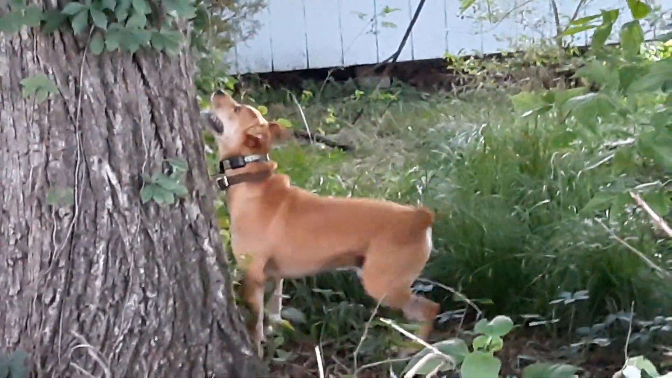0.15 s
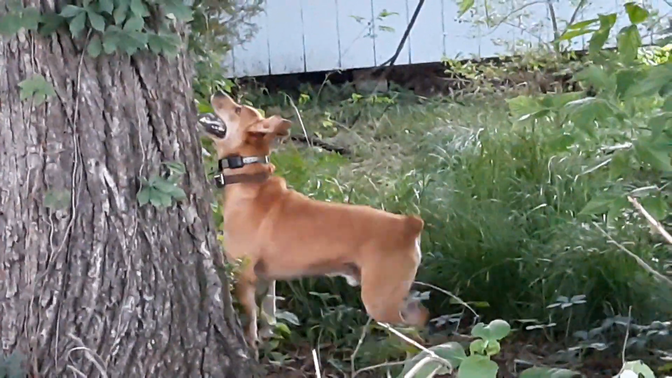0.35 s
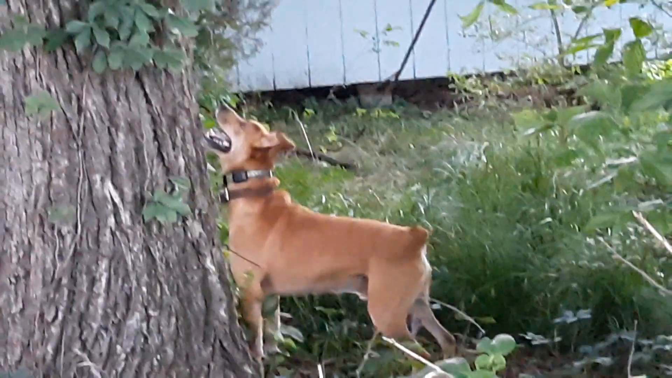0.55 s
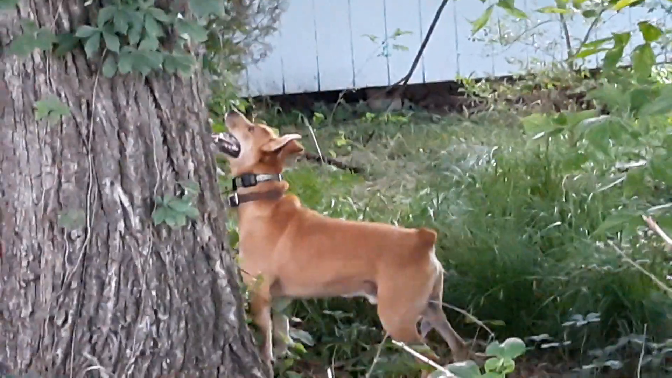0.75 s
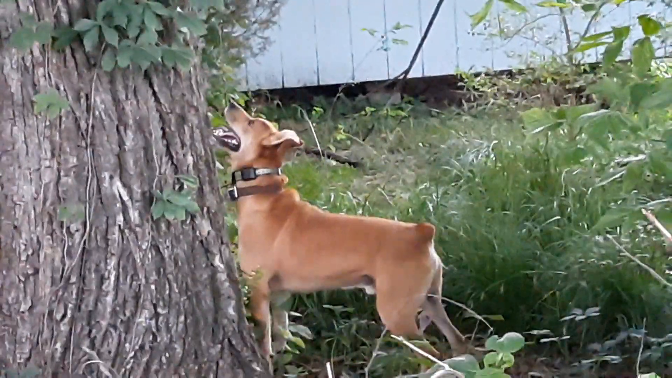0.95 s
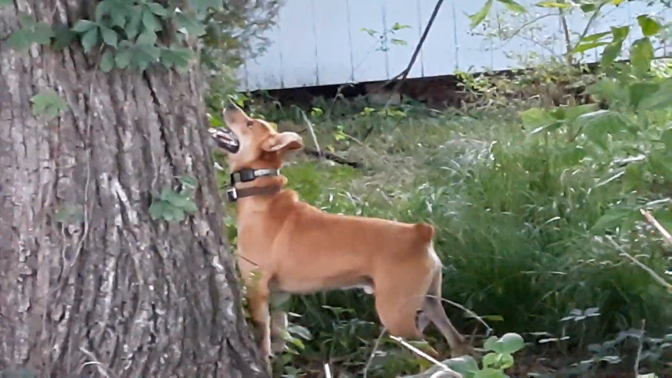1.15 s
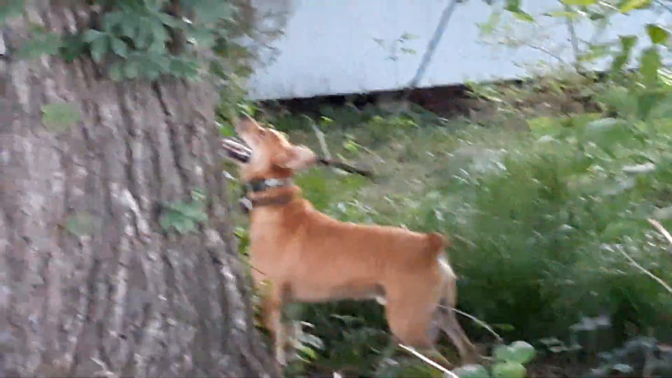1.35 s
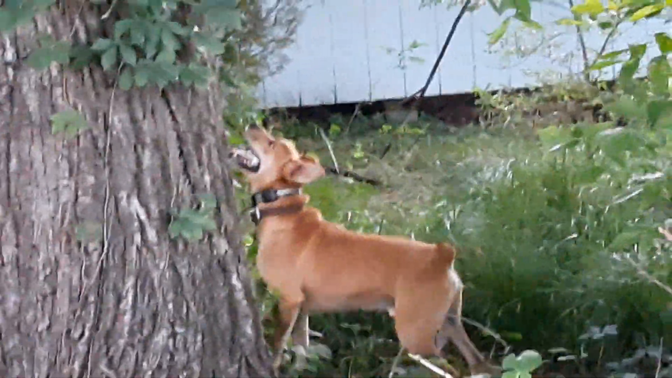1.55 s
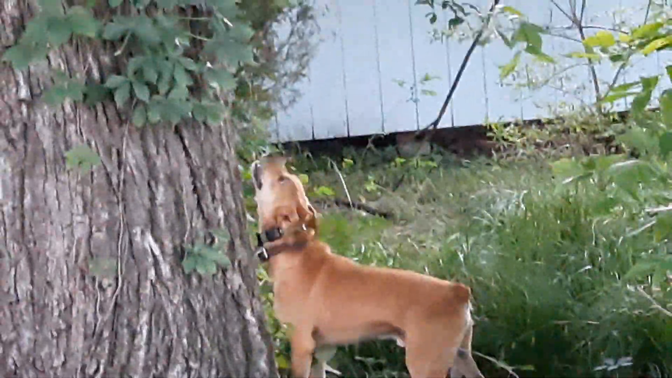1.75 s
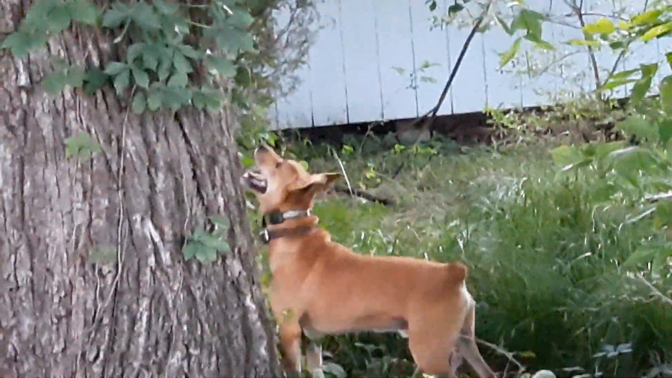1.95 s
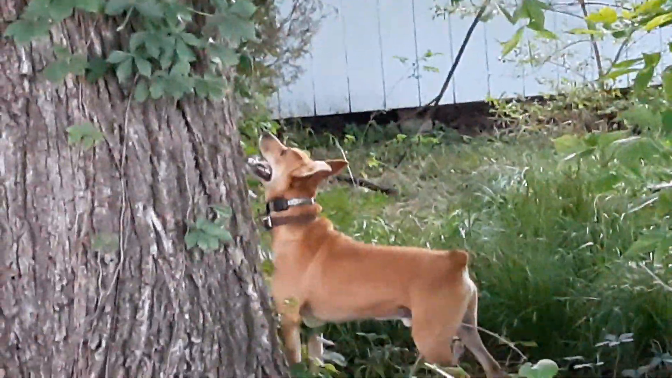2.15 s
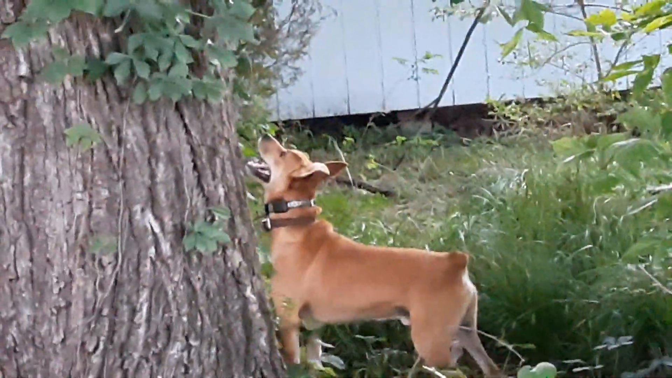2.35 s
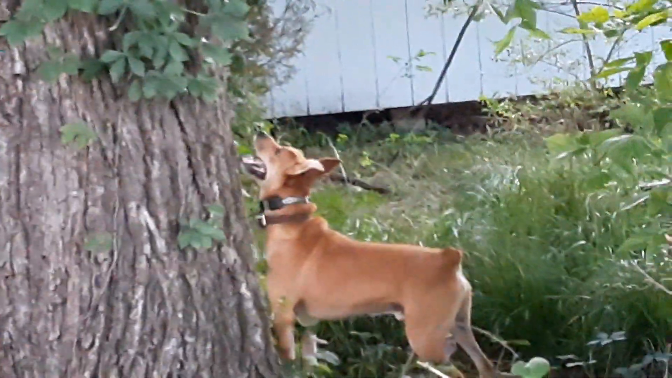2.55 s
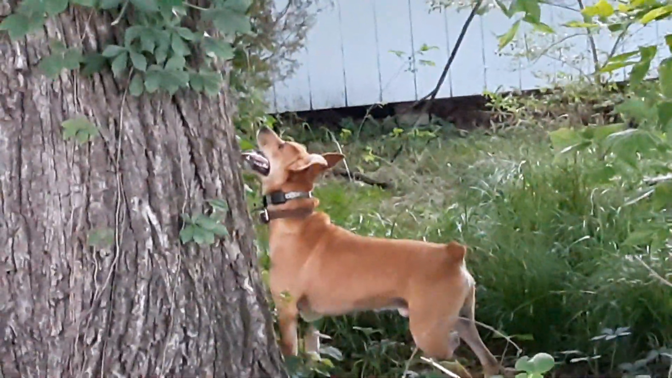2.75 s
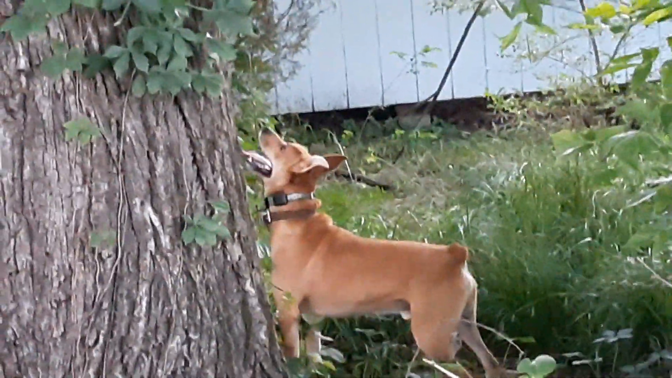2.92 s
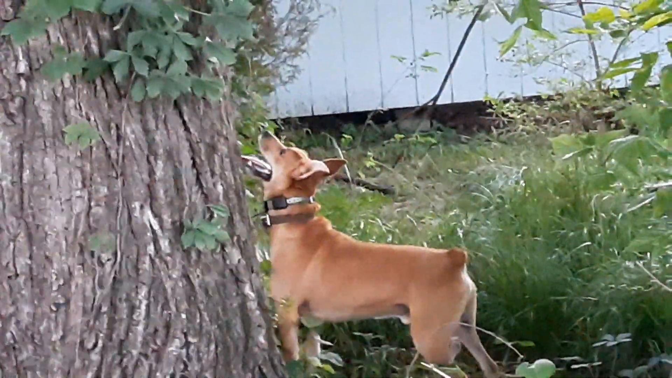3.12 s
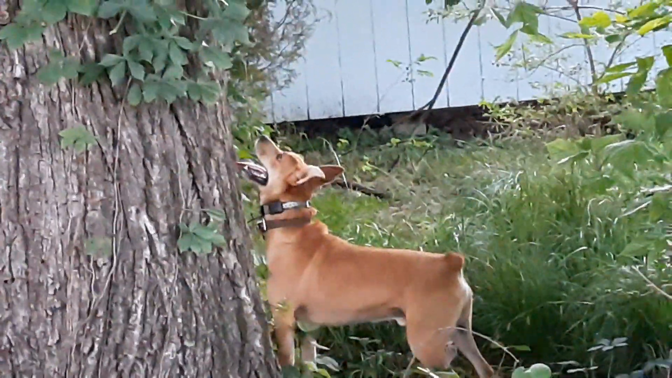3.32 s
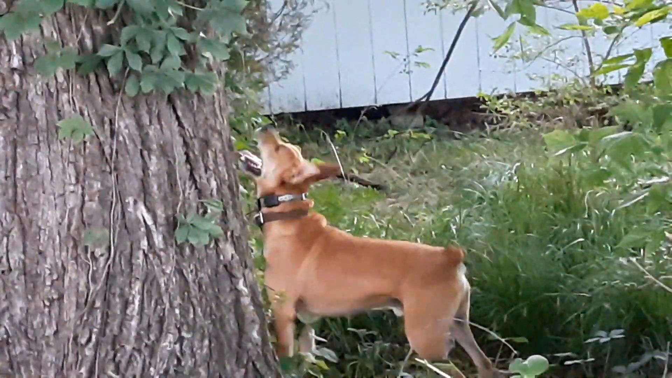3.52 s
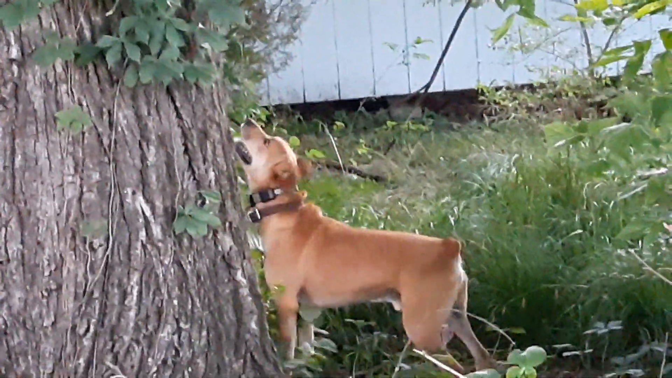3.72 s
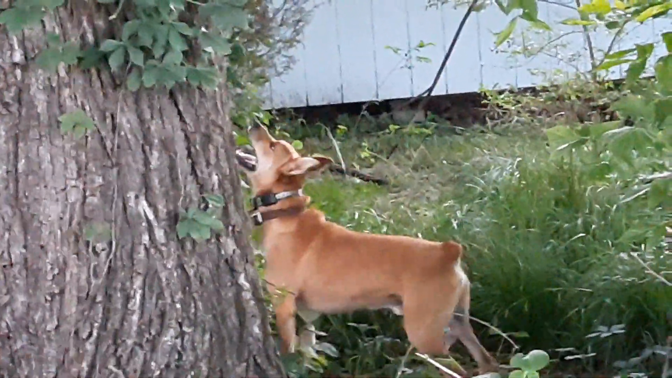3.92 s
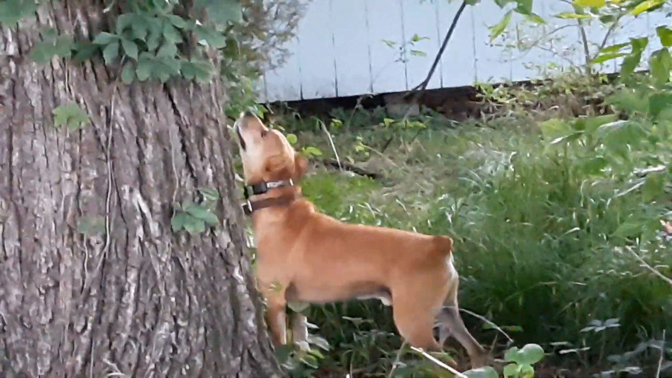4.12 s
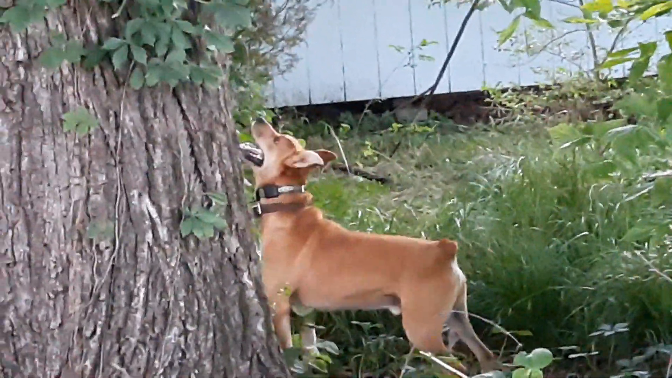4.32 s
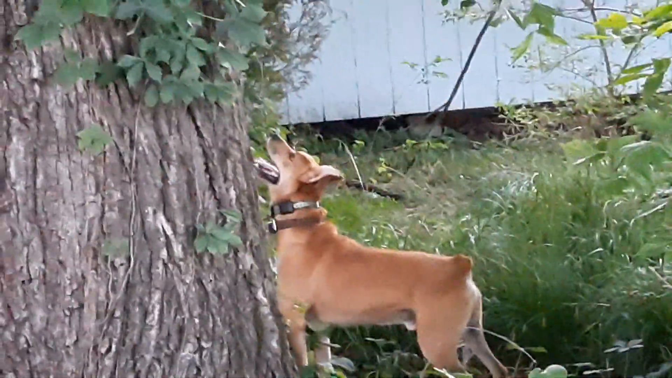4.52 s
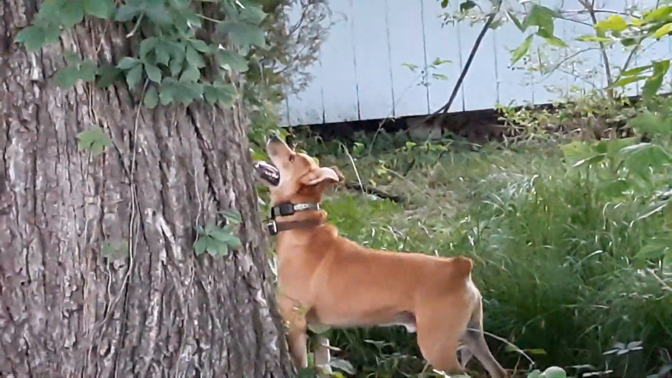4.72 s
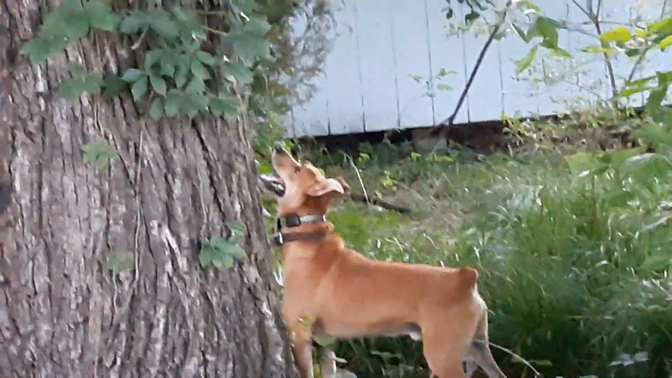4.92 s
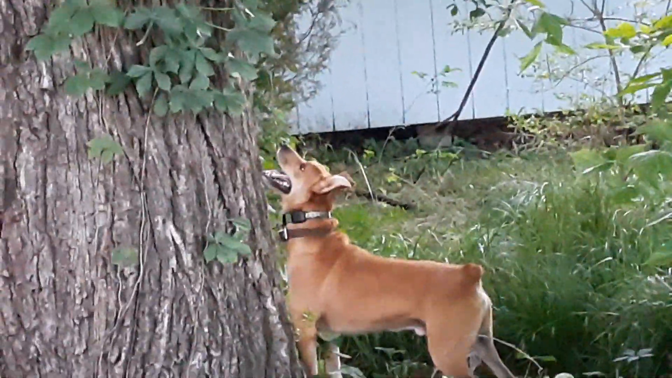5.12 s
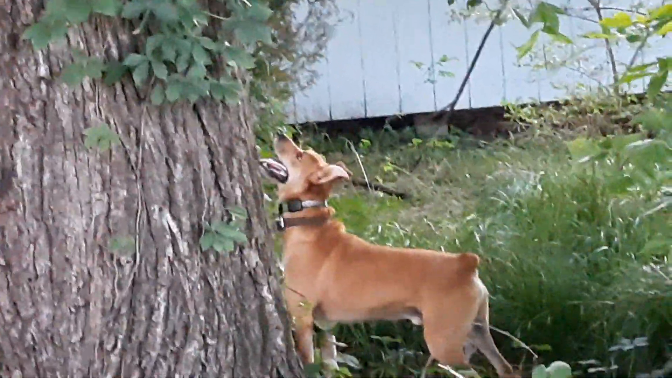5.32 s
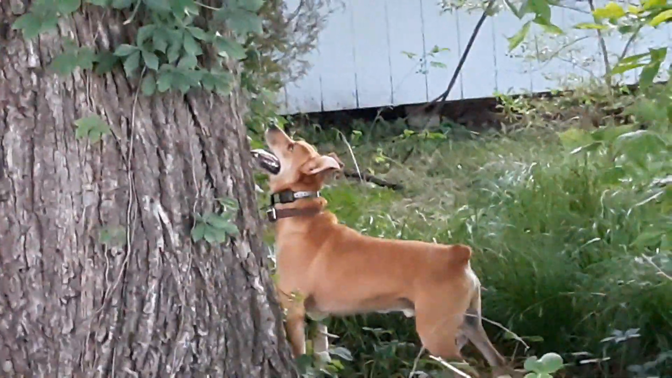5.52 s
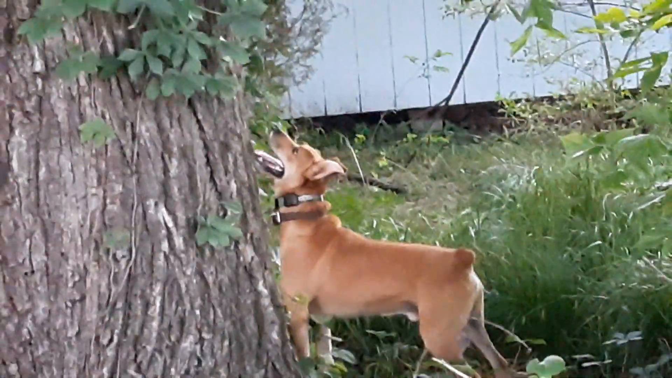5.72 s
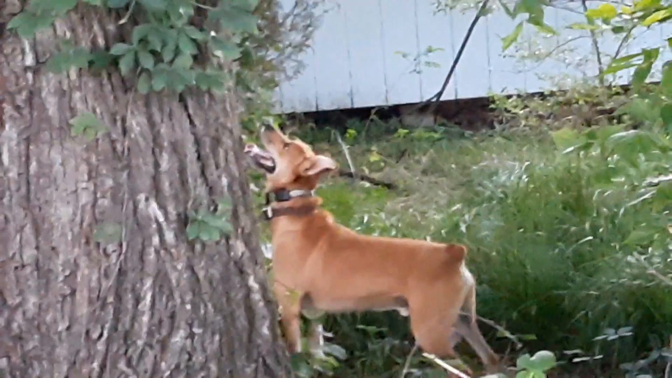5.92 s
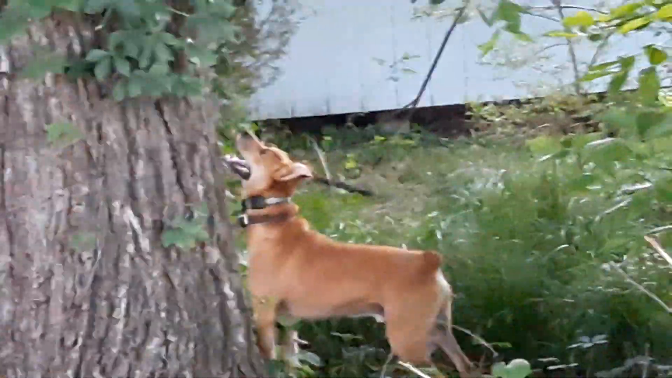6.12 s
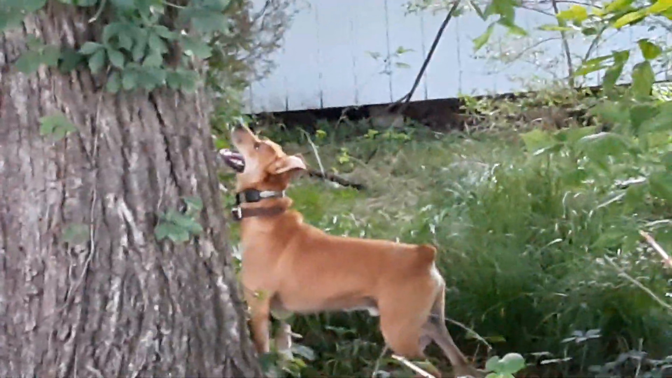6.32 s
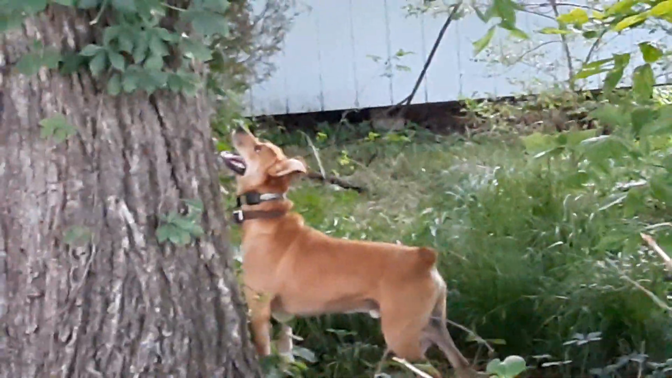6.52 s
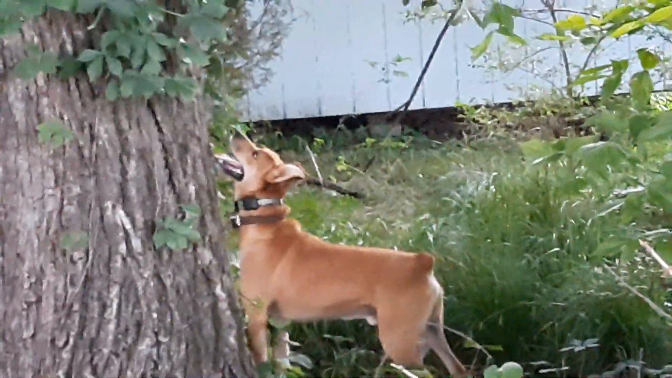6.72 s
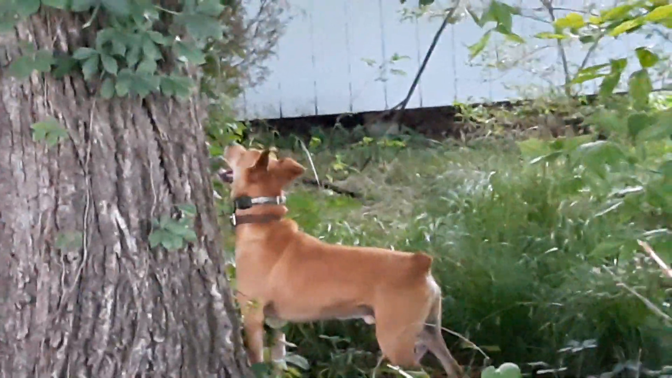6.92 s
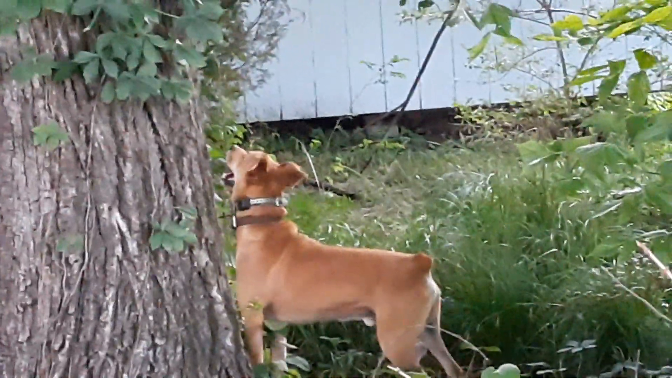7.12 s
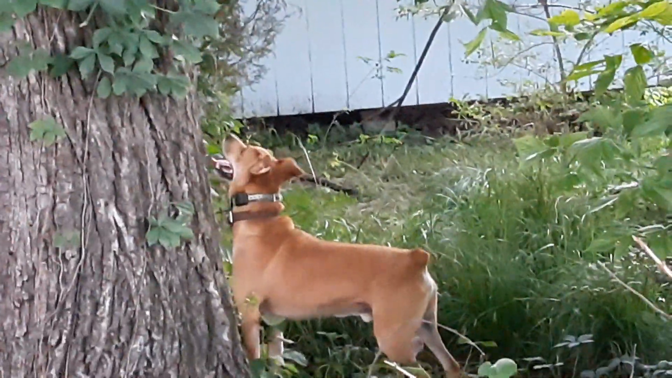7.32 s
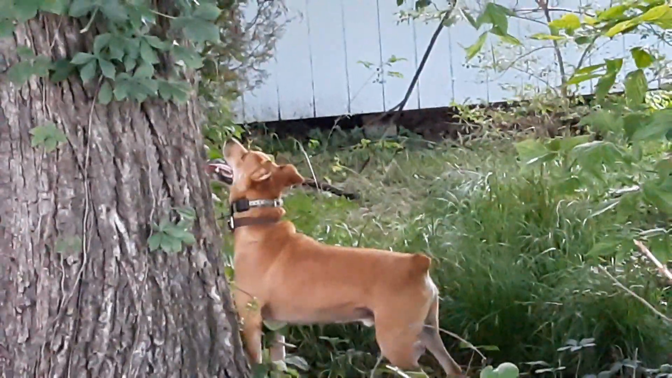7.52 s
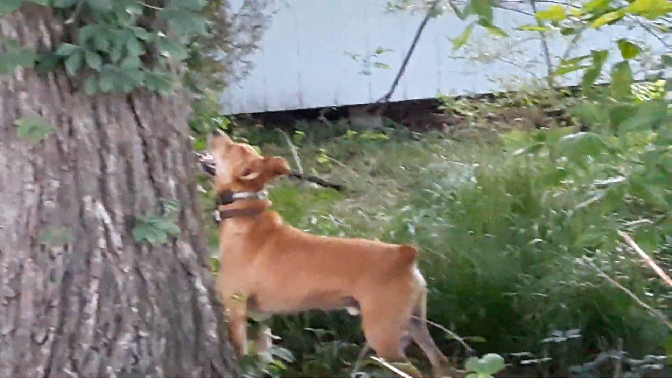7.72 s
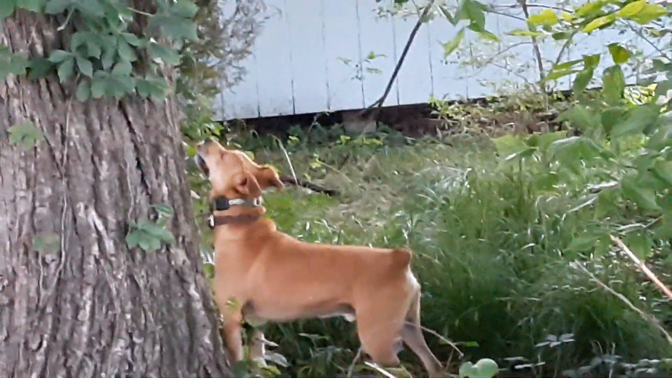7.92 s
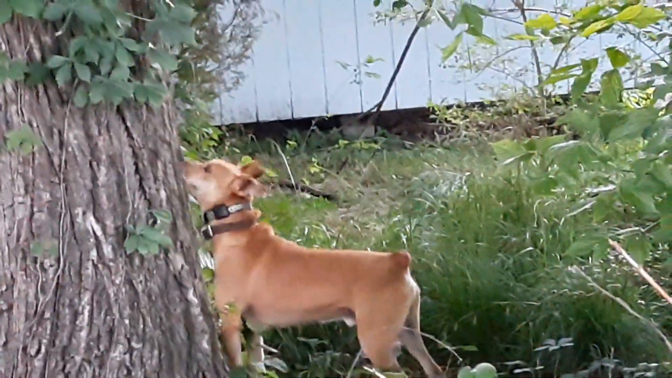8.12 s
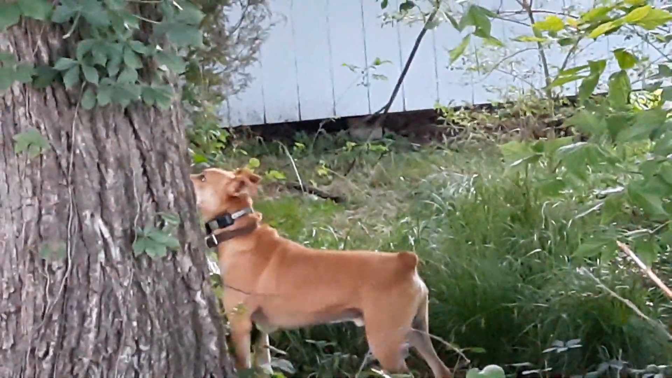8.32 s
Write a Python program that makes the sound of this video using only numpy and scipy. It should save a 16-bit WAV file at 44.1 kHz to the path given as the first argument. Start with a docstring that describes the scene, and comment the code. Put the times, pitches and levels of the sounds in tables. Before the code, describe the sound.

Sharp, high-pitched barks, very loud against a quiet backdrop of low hum and hissing leaves, leap up, hold briefly and drop into a grunt, with a short garden echo. Dry grass rustles early on. A quieter second dog gives rising, hoarse yelps that sag into whines. A bird repeats a bright, bending whistle mid-way, and small chirps follow. The barking stops by the half; yelps, a late rustle and a wavering howl finish it.

```python
"""A low outdoor hum and a faint hiss of leaves, both shaped noise, run throughout.
A small dog is already barking up a tree as it starts, and trunk, fence and houses answer: sung tones plus breath noise.
Then come rustles of crackling noise, a farther dog's rising yelps and three more barks.
Around the last barks a songbird whistles its phrase four times; chirps are scattered about.
The far dog yelps on, the grass rustles once more, and a thin howl with a strong octave overtone ends it."""
import sys
import numpy as np
from scipy import signal
from scipy.fft import rfft, irfft, next_fast_len
from scipy.io import wavfile
from scipy.ndimage import uniform_filter1d, minimum_filter1d, map_coordinates

SR = 44100
rng = np.random.default_rng(int(sys.argv[2]) if len(sys.argv) > 2 else 0)


def unload_wav(signal):
    """Save mono or channel-first audio to the path in sys.argv[1] as 16-bit WAV at rate SR, clipped to [-1, 1]."""
    wavfile.write(
        sys.argv[1],
        SR,
        np.round(np.clip(np.atleast_2d(signal).T, -1, 1) * 32767).astype(np.int16),
    )


N = 368676
TIME = np.arange(N) / SR  # s

# All levels are relative: the functions below add the final balance.
# tone of the outdoor hum: (frequency [Hz], level [dB per Hz])
HUM = [(15, -51), (25, -17), (59, -13), (81, -1.5), (96, 4.5), (186, -10), (221, -18), (243, -16),
       (310, -21), (400, -22.5), (520, -49), (880, -120)]
# how the hum comes and goes: (time [s], level [dB])
HUM_LEVEL = [(0.0, -67.5), (0.54, -85), (1.39, -87), (1.61, -75), (1.86, -71), (2.35, -80), (3.68, -72),
             (4.31, -76), (4.91, -81), (5.26, -89.5), (5.82, -74.5), (7.36, -74.5), (8.36, -73)]
# tone of the hissing leaves: (frequency [Hz], level [dB per Hz])
LEAVES = [(150, -13.5), (400, 3), (700, -5), (1200, -1.5), (2200, -3.5), (3100, -9.5), (4000, -2.5),
          (5000, -7), (6000, -4.5), (7300, -11), (8600, -17), (11000, -16.5), (13000, -14.5), (15500, -22)]
# how alike left and right are in hum and leaves: (frequency [Hz], likeness [0-1])
ALIKE = [(60, 0.75), (250, 1), (600, 0.55), (1500, 0.025), (5000, 0.13)]
# rustles in the grass: (start [s], length [s], swish level [dB], upper limit [Hz], thud level [dB])
RUSTLES = [(0.474, 0.047, -55.5, 13900, -85), (0.499, 0.082, -62.5, 12100, -94),
           (1.136, 0.32, -63, 6923, -102), (1.388, 0.13, -56.5, 3040, -71),
           (1.441, 0.29, -62, 12150, -77.5), (7.712, 0.32, -60, 2660, -78)]
# tone of the rustling grass: (frequency [Hz], level [dB per Hz])
GRASS = [(300, -22.5), (1200, 2), (2000, -1.5), (3500, 0.5), (6500, -3), (9000, -9), (12000, -3),
         (16000, -14)]
# notes of the songbird's phrase: (start in the phrase [s], length [s], first pitch [Hz],
# middle pitch [Hz], last pitch [Hz], level [dB], pitch waver [share])
PHRASE = [(0, 0.028, 4400, 4300, 4200, -26.5, .12), (0.013, .048, 3774, 3100, 3000, -12, .07),
          (0.061, .068, 2140, 3358, 4090, -5.5, .04), (0.174, .06, 2705, 2353, 2402, -6, 0.033),
          (.235, .03, 2480, 2700, 2890, -2, .025), (.305, .11, 1775, 1950, 1682, -6.5, .02)]
# when the phrase is sung: (start [s], level [dB])
SONG = [(2.237, -49), (2.74, -42), (3.245, -38.5), (3.757, -43.5)]
# other birds' chirps: (start [s], length [s], first pitch [Hz], last pitch [Hz], level [dB])
CHIRPS = [(3.15, 0.029, 6070, 6010, -57), (3.169, 0.034, 6030, 5280, -59.5),
          (4.267, 0.035, 4420, 4350, -65), (4.595, 0.086, 4200, 4100, -73.5),
          (6.538, 0.046, 2390, 2300, -73.5), (6.893, 0.049, 3820, 4740, -62.5),
          (7.059, 0.044, 4034, 4527, -64), (7.375, 0.071, 3860, 4400, -64.5)]
# yelps of the far dog: (start [s], hold [s], sinking time [s], top pitch [Hz], sag [share of pitch],
# level [dB], mouth resonance lift [dB], roughness [0-1])
WHINES = [(.8, 0.15, .075, 654, .4, -47.5, 2.5, .5), (3.06, 0.15, .09, 672, .25, -44, 4, .35),
          (4.775, 0.14, 0.042, 656, 0.039, -47.5, 6, 0.23),
          (5.465, 0.021, 0.11, 599, 0.34, -57.5, -6, 0.65),
          (5.675, 0.0902, 0.0504, 591.7, .12, -47, -1.5, 0.47),
          (7.188, .17, .09, 665.6, 0.23, -43, 2, 0.36)]
# throat of the far dog: (frequency [Hz], level [dB])
WHINE_THROAT = [(200, -25.5), (350, 7.5), (550, -2), (700, -5), (900, -4), (1100, -9), (1300, -7),
                (1500, -19.5), (1720, -7.5), (2000, -36.5), (2600, -33.5), (3300, -27.5), (5000, -49)]
# strong second harmonic heard as the yelps sink, one curve per stretch: (time [s], pitch [Hz], level [dB])
SECOND_HARMONICS = [
    [(4.98, 988, -58), (5.008, 1026, -48), (5.072, 977, -50), (5.19, 998, -60.5)],
    [(5.21, 822, -80), (5.242, 851, -47.5), (5.292, 793.5, -54), (5.446, 860, -44.5), (5.52, 808.0, -90)],
    [(7.39, 980, -46.5), (7.472, 851, -51.5), (7.6, 783, -58.5)],
]
# a long thin howl that sags and rises again: (time [s], pitch [Hz], level [dB])
HOWL = [(7.55, 649, -52), (7.598, 677.3, -47.5), (7.746, 687.7, -53), (7.964, 625.1, -54),
        (8.172, 668.6, -50), (8.304, 657, -55), (8.36, 685.4, -41.5)]
# barks of the near dog: (start [s], top pitch [Hz], upward scoop [share of pitch],
# attack time constant [s], level [dB], roughness [0-1], mouth resonance lift [dB], jaw hiss [dB])
BARKS = [(-.013, 528.8, .33, 0.012, -10.5, .4, 3, -45), (1.679, 551.6, .18, .01, -7, .13, -1, -43),
         (3.552, 553.5, .16, .011, -6.5, .18, 0, -44.5), (3.977, 533.3, .46, .02, -10, .32, 3, -47)]
# throat and mouth of the near dog: (frequency [Hz], level [dB])
THROAT = [(120, -17.5), (300, -21.5), (450, -15.5), (560, -22.5), (700, -18.5), (860, -9), (1000, -3),
          (1130, -1.5), (1350, -15.5), (1650, -16.5), (2100, -22), (2600, -36.5), (3300, -60.5),
          (4200, -57.5)]
# air rushing through its open jaws: (frequency [Hz], level [dB per Hz])
JAW_HISS = [(1500, -29), (2500, 1.5), (3300, -1.5), (4100, -6), (5300, -1), (7000, 3.5), (8100, -4.5),
            (8900, -16), (10500, -5.5), (12000, -9.5), (14000, -20.5), (16000, -23.5)]
# ground, trunk, fence and house wall: (delay [s], level [dB], left-right lag [ms])
WALLS = [(0.0099, -13.5, -0.5), (0.0211, -4, 0.1), (0.029, -10, 0.032), (.138, -37, 0.17)]
# how long the garden rings: (frequency [Hz], time to die by 60 dB [s])
GARDEN = [(150, 0.33), (500, 1), (1100, 0.64), (2200, 1), (4000, 1), (7000, 0.5), (14000, 0.091)]

NOTE_EDGE_DB = 9  # a bird note's ends lie this far under its middle
YELP_SCOOP, YELP_RISE_S = .47, .04  # a yelp starts this share under its top pitch; time constant of the rise
YELP_ATTACK_DB, YELP_ATTACK_S, YELP_RELEASE_DB = 22, 0.041, 25.5
BREAK_S, BREAK_WIDTH_S, BREAK_DB, BREAK_ROUGH = 0.1, 0.015, 5, .3  # the voice dips and rasps as it changes register
SCOOP_S, HOLD_S, BARK_S = .034, .107, .24  # from a bark's start: time scale of the scoop, end of the push, silence
GRUNT_SHARE, GRUNT_S = .17, .03  # the pitch then sinks towards this share, halfway in this time
ATTACK_DB = 30  # a bark swells from this far under its level
CREST_S, DROOP_DB_PER_S = .07, 69.5  # the push starts to ease here, at this rate
CUT_DB, CUT_S, FADE_DB_PER_S = 16.5, 0.022, 244  # after the push: a quick drop, with a steady fade
ONSET_ROUGH, ONSET_ROUGH_S, GRUNT_ROUGH = .45, 0.01, 0.74  # extra roughness while the folds start and slacken
HISS_RISE_DB, HISS_RISE_S, HISS_FADE_DB_PER_S = 20.5, 0.053, 207  # the air in the jaws swells and dies more slowly
TOP_HZ = 15750  # nothing is heard above this


def amp(db):
    """Turn decibels into a plain multiplier."""
    return 10 ** (np.asarray(db) / 20)


def unit(x):
    """Scale a sound to an average (rms) strength of 1."""
    return x / np.sqrt(np.mean(x ** 2) + 1e-20)


def along(points, hz):
    """Read (frequency [Hz], value) points at hz, on a log frequency axis."""
    f, v = np.transpose(points)
    return np.interp(np.log(np.abs(hz) + 1), np.log(np.abs(f) + 1), v)


def curves(rows, t):
    """Read each column after the time at the times t."""
    s, *cols = np.transpose(rows)
    return [np.interp(t, np.sort(s), c) for c in cols]


def span(start, length):
    """The samples that a call covers, a fade for its ends, and the time since its start."""
    at = np.flatnonzero((TIME >= start) & (TIME <= start + length))
    age = TIME[at] - start
    fade = np.clip(np.minimum(age, length - age) / .004, 0, 1)
    return at, fade, age


def wobble(rate, size):
    """A smooth random curve with this many random points a second."""
    points = rng.standard_normal(int(size * rate / SR) + 4)
    return map_coordinates(points, [np.arange(size) * rate / SR])


def filtered(x, response):
    """Multiply each frequency of x by the response at that frequency."""
    size = x.shape[-1]
    m = next_fast_len(size + 8192)  # spare room lets the filter ring out
    return irfft(rfft(x, m) * response(np.fft.rfftfreq(m, 1 / SR)), m)[..., :size]


def noise(spectrum, shape):
    """Random noise coloured by a spectrum, with rms 1."""
    return unit(filtered(rng.standard_normal(shape), lambda hz: amp(along(spectrum, hz))))


def spread(spectrum):
    """Stereo noise, alike in the bass and mostly unrelated in the treble."""
    def turn(hz):
        return np.arccos(np.clip(along(ALIKE, hz), -1, 1)) / 2

    mid, side = filtered(noise(spectrum, (2, N)), lambda hz: np.array([np.cos(turn(hz)), np.sin(turn(hz))]))
    return unit(np.array([mid + side, mid - side]))


def ports(x, lag_ms, pan_db=0):
    """A sound from one side reaches the left channel later by the lag, and louder by the pan."""
    sides = np.array([[1], [-1]]) / 2
    return amp(pan_db * sides) * filtered(x, lambda hz: np.exp(-2j * np.pi * hz * lag_ms / 1000 * sides))


def echo(x, t60s, build, alike):
    """Scattered reflections that build up and die at each frequency's own speed."""
    hz, t, z = signal.stft(rng.standard_normal((2, 2 * SR)), SR, nperseg=256)
    decay = amp(-60 * t / along(t60s, hz)[:, None])
    mid, side = signal.istft(z * decay * (1 - np.exp(-t / build)), SR, nperseg=256)[1]
    # less side makes left and right more alike
    side = side * np.sqrt(np.clip((1 - alike) / (1 + alike), 0, 1))
    tail = np.array([mid + side, mid - side])
    return signal.fftconvolve(x[None], tail / np.linalg.norm(tail[0]), axes=1)[:, :N]


def air(hum_db=4, leaf_db=-67.0, hum_sway_db=0.0, leaf_sway_db=1):
    """A low outdoor hum that comes and goes, and a gently swaying hiss of leaves, both shaped noise."""
    hum_curve_db = hum_db + curves(HUM_LEVEL, TIME)[0] + hum_sway_db * wobble(3.2, N)
    hum = amp(hum_curve_db) * spread(HUM)
    leaves = amp(leaf_db + leaf_sway_db * wobble(5.3, N)) * spread(LEAVES)
    return hum + leaves


def rustles(grain_db=-2.0):
    """Dry stalks crackle as unsteady noise over a soft, low thud."""
    out = np.zeros((2, N))
    for s, length, swish_db, top_hz, thud_db in RUSTLES:
        at = np.flatnonzero((TIME >= s) & (TIME < s + length))
        stalks = noise(GRASS, (2, len(at))) * amp(grain_db * wobble(370, len(at)))
        swish = unit(filtered(stalks, lambda hz: 1 / (1 + (hz / top_hz) ** 10)))
        thud = noise(HUM, len(at))
        swell = np.sqrt(np.abs(np.hanning(len(at))))
        out[:, at] += swell * (amp(swish_db) * swish + amp(thud_db) * thud)
    return out


def whistle(rows, overtone_db, waver):
    """A tone with one octave overtone that follows (time [s], pitch [Hz], level [dB]) rows."""
    at, fade, _ = span(rows[0][0], rows[-1][0] - rows[0][0])
    pitch, db = curves(rows, TIME[at])
    phase = 2 * np.pi * np.cumsum(pitch * (1 + waver * wobble(120, len(at)))) / SR
    tone = np.sin(phase) + amp(overtone_db) * np.sin(2 * phase)
    out = np.zeros(N)
    out[at] = np.sqrt(2) * fade * amp(db) * tone
    return out


def note(start, length, first_hz, middle_hz, last_hz, db):
    """Rows of a bird's note: the pitch bends through three values under an arch of level."""
    u = np.linspace(-1, 1, 15)  # from the note's start to its end
    bend = (first_hz + last_hz) / 2 - middle_hz
    pitch = middle_hz + u * (last_hz - first_hz) / 2 + u ** 2 * bend
    return np.transpose([start + length * (u + 1) / 2, pitch, db - NOTE_EDGE_DB * u ** 2])


def birds():
    """Bending whistles with a faint overtone: one phrase sung four times, and scattered chirps."""
    out = np.zeros(N)
    for start, level_db in SONG:
        for s, *shape, db, waver in PHRASE:
            rows = note(start + s, *shape, level_db + db)
            out += whistle(rows, overtone_db=-34.5, waver=waver)
    for s, length, first_hz, last_hz, db in CHIRPS:
        rows = note(s, length, first_hz, (first_hz + last_hz) / 2, last_hz, db)
        out += whistle(rows, overtone_db=-42.0, waver=.035)
    return out


def folds(pitch, rough, throat, jitter, shimmer, halves, rasp):
    """Vocal folds through a throat; roughness adds jitter, uneven alternate cycles and pulsed noise."""
    size = len(pitch)
    pitch = pitch * (1 + jitter * rough * wobble(350, size))
    phase = 2 * np.pi * np.cumsum(pitch) / SR

    def partial(k):
        return amp(along(throat, k * pitch)) * np.sin(k * phase + rng.uniform(0, 2 * np.pi))

    clean = sum(partial(k) for k in np.arange(1, 10))
    # tones halfway between the harmonics come from uneven alternate cycles
    between = sum(partial(k + .5) * wobble(90, size) for k in np.arange(1, 10))
    voiced = np.sqrt(2) * (clean + halves * rough * between) * (1 + shimmer * rough * wobble(200, size))
    puffs = rng.standard_normal(size) * (1 + .5 * np.cos(phase))
    # turbulence holds little below the lowest resonance
    turbulence = filtered(puffs, lambda hz: amp(along(throat, hz)) / (1 + (380 / (hz + 1)) ** 10))
    return voiced + rasp * rough * unit(turbulence)


def yelp_shape(age, hold, sink, top_hz, sag, level_db, roughness):
    """Pitch, level and roughness of a yelp: it slides up through a register break, holds and sinks hoarsely."""
    sunk = np.maximum(age - hold, 0) / sink
    crack = np.exp(-((age - BREAK_S) / BREAK_WIDTH_S) ** 2)
    pitch = top_hz * (1 - YELP_SCOOP * np.exp(-age / YELP_RISE_S)) * (1 - sag * sunk)
    attack_db = -YELP_ATTACK_DB * np.maximum(1 - age / YELP_ATTACK_S, 0)
    db = level_db + attack_db - BREAK_DB * crack - YELP_RELEASE_DB * sunk ** 1.5
    return pitch, db, roughness + BREAK_ROUGH * (crack + sunk)


def whines(hiss_db=-28, howl_db=-3, harmonic_db=-3, undertone_db=-21):
    """Yelps from rough folds sink into a strong second harmonic; a thin howl has a strong octave overtone."""
    out = amp(howl_db) * whistle(HOWL, overtone_db=-4, waver=0.0095)
    # the howl's folds also vibrate faintly a fifth lower
    undertone = [(s, hz * 2 / 3, db) for s, hz, db in HOWL]
    out += amp(undertone_db) * whistle(undertone, overtone_db=-8, waver=.03)
    out += amp(harmonic_db) * sum(whistle(rows, overtone_db=-28, waver=0.0091) for rows in SECOND_HARMONICS)
    for start, hold, sink, top_hz, sag, level_db, lift_db, roughness in WHINES:
        at, fade, age = span(start, hold + sink)
        pitch, db, rough = yelp_shape(age, hold, sink, top_hz, sag, level_db, roughness)
        rough = np.clip(rough, 0, .7)
        voice = folds(pitch, rough, WHINE_THROAT, jitter=.045, shimmer=.7, halves=.6, rasp=.42)
        # the mouth's shape lifts or lowers the second harmonic
        mouth = [(700, 0), (950, lift_db), (1350, lift_db), (1650, 0)]
        voice = filtered(voice, lambda hz: amp(along(mouth, hz)))
        breath = noise([(3000, -23.5), (5000, -7), (7200, -11.5), (8600, -9.5), (10000, -21.5)], len(at))
        quaver_db = 2.2 * wobble(55, len(at))
        out[at] += fade * amp(db + quaver_db) * (voice + amp(hiss_db) * breath)
    return out


def bark_shape(age, top_hz, scoop, attack, level_db, roughness):
    """Pitch, level and roughness of one push of air: a rough scoop up, a clear hold, a collapse."""
    after = np.maximum(age - HOLD_S, 0)
    slack = after ** 2 / (after ** 2 + GRUNT_S ** 2)
    pitch = top_hz * (1 - scoop * np.exp(-(age / SCOOP_S) ** 2)) * (1 - (1 - GRUNT_SHARE) * slack)
    droop_db = -DROOP_DB_PER_S * np.clip(age - CREST_S, 0, HOLD_S - CREST_S)
    push_db = -ATTACK_DB * np.exp(-age / attack) + droop_db
    release_db = -CUT_DB * (1 - np.exp(-(after / CUT_S) ** 2)) - FADE_DB_PER_S * after
    rough = roughness + ONSET_ROUGH * np.exp(-age / ONSET_ROUGH_S) + GRUNT_ROUGH * slack
    return pitch, level_db + push_db + release_db, rough


def barks(open_db=4.5, dull_db=8, widest=0.025, closing=0.031, chest_db=12.5, shut_after=0.09, flutter_db=3.0):
    """Each bark leaps up in pitch, holds its second harmonic on the mouth resonance and drops to a grunt."""
    out = np.zeros(N)
    for start, *shape, lift_db, hiss_db in BARKS:
        at, fade, age = span(start, BARK_S)
        pitch, db, rough = bark_shape(age, *shape)
        voice = folds(pitch, rough, THROAT, jitter=.03, shimmer=.4, halves=.8, rasp=.44)
        # the lower barks lean harder on the mouth resonance
        mouth = [(620, 0), (780, lift_db), (1250, lift_db), (1500, 0)]
        voice = filtered(voice, lambda hz: amp(along(mouth, hz)))
        # the jaws snap wide at the attack, so the upper resonances start strong
        wide = np.exp(-((age - widest) / closing) ** 2)
        upper = filtered(voice, lambda hz: 1 / (1 + (1350 / (hz + 1)) ** 10))
        upper_gain = amp(open_db * wide - dull_db * (1.0 - wide))
        # as they shut, the fundamental takes over from the mouth resonance
        shut = .5 + .5 * np.tanh((age - shut_after) / 0.012)
        lower = filtered(voice, lambda hz: 1 / (1 + (hz / 680) ** 10))
        lower_gain = amp(chest_db * shut - 8.0)
        voice = voice + (upper_gain - 1) * upper + (lower_gain - 1) * lower
        # the rush of air swells later than the voice and outlasts it
        rise_db = -HISS_RISE_DB * np.maximum(1 - age / HISS_RISE_S, 0) ** 0.95
        flow_db = rise_db - HISS_FADE_DB_PER_S * np.maximum(age - HOLD_S, 0)
        hiss = amp(hiss_db + flow_db + flutter_db * wobble(90, len(at))) * noise(JAW_HISS, len(at))
        out[at] += fade * (amp(db) * voice + hiss)
    return out


def walls(x):
    """Ground, trunk, fence and house throw the bark back; rough faces return mostly the middle range."""
    faces = [(500, -12.5), (850, -9.0), (1100, -0.5), (1500, -9), (4000, -16.5)]
    body = filtered(x, lambda hz: amp(along(faces, hz)))
    return sum(amp(db) * ports(np.interp(TIME - delay, TIME, body, left=0), lag) for delay, db, lag in WALLS)


def scene():
    """Place the barking dog close by, the whining one off to the side, and the birds in the trees."""
    near, far, song = barks(), whines(), birds()
    # trunk and leaves scatter the treble most, differently to each side
    scatter = [(500, -14), (1100, -16.0), (2000, 0.5), (6000, -3.5)]
    scattered = filtered(near, lambda hz: amp(along(scatter, hz)))
    dog = ports(near, lag_ms=.02) + walls(near)
    dog += echo(scattered, [(500, .16), (7000, .19)], build=.004, alike=.25)
    dog += amp(-18.0) * echo(near, GARDEN, build=0.031, alike=0.49)
    # distant houses keep a faint trace of the ring for over a second
    houses = [(400, 1.9), (1100, 3), (3000, 3.4), (8000, 0.27)]
    dog += amp(-51.5) * echo(near, houses, build=0.88, alike=0.71)
    whining = amp(3) * ports(far, lag_ms=-.44, pan_db=-2.5)
    whining += amp(-7.5) * echo(far, GARDEN, build=.025, alike=.4)
    singing = amp(-3) * ports(song, lag_ms=0, pan_db=-6.5)
    singing += amp(1.5) * echo(song, [(2000, .7), (5000, 1.0)], build=0.0081, alike=0.12)
    return dog + whining + singing + rustles() + air()


def record(dry):
    """A limiter smoothly turns down peaks above 0.97 of full scale; then all above TOP_HZ is cut."""
    needed = np.minimum(1, .97 / (np.abs(dry).max(axis=0) + 1e-9))
    gain = uniform_filter1d(minimum_filter1d(needed, size=600), size=600)
    return filtered(dry * gain, lambda hz: hz < TOP_HZ)


dry = scene()
out = record(dry)
unload_wav(out)
```